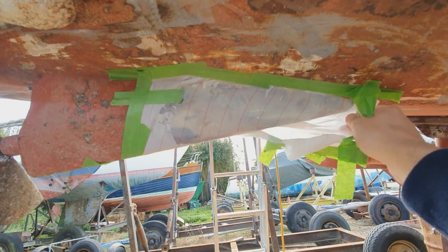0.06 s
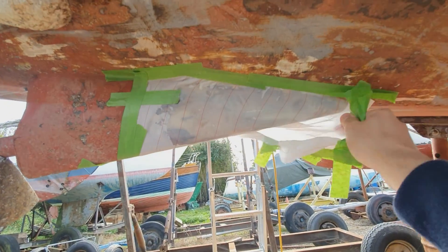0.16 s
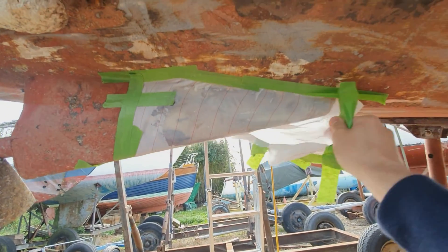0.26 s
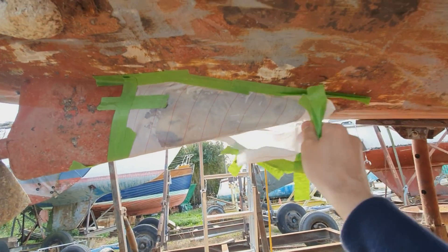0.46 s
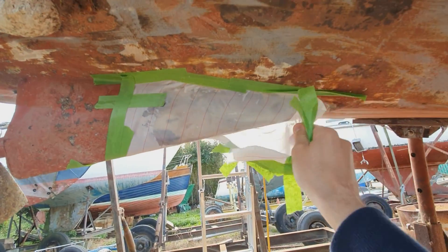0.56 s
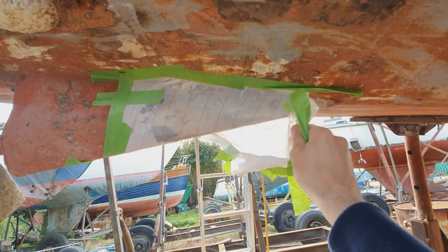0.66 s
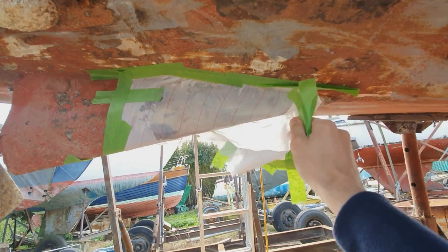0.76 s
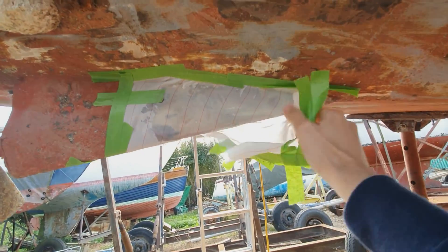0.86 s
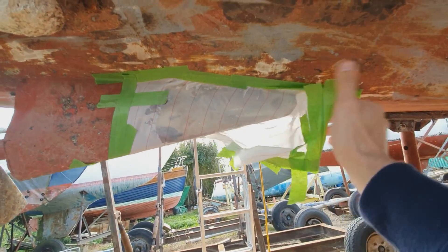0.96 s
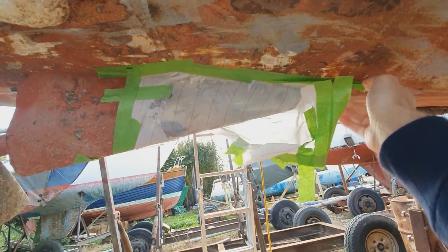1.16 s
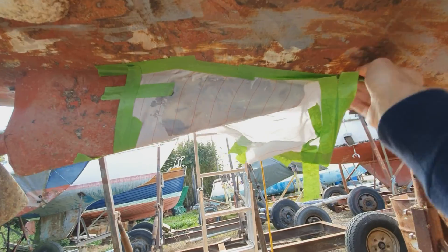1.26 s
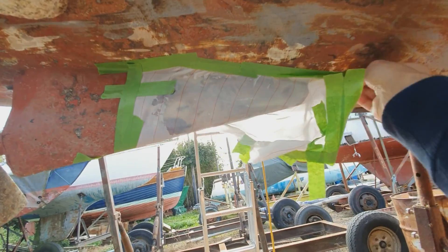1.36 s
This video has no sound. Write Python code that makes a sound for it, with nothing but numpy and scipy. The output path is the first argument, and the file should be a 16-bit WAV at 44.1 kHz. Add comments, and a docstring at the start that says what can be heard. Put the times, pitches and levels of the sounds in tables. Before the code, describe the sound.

Tape rips off a boat hull with a brief crackle, then loose plastic crinkles faintly.

```python
"""Peeling tape off a boat hull

In a boatyard, close to the microphone and to its right, a hand peels masking tape and plastic sheeting
off a hardened patch. The glue lets go in a rush of tiny slips and a few hard snaps; the freed sheet
drums lower as it grows, then falls slack. Last crinkles and a soft hiss follow, over the yard's hum."""
import sys
import numpy as np
from scipy import signal
from scipy.fft import rfft, irfft
from scipy.io import wavfile
from scipy.ndimage import uniform_filter1d

SR = 44100
rng = np.random.default_rng(int(sys.argv[2]) if len(sys.argv) > 2 else 0)


def generate_wav(signal):
    """Clip the signal to [-1, 1] and save it as 16-bit WAV at the path in sys.argv[1]."""
    frames = np.transpose(np.atleast_2d(signal))
    scaled = np.clip(frames, -1, 1) * 32767
    pcm = np.round(scaled).astype(np.int16)
    wavfile.write(sys.argv[1], SR, pcm)


N = 61739
TIME = np.arange(N) / SR


def amp(db):
    """Decibels to gain."""
    return 10 ** (np.asarray(db) / 20)


def unit_rms(x):
    """Scales to unit rms."""
    return x / np.sqrt(np.mean(x ** 2) + 1e-20)


def curve(rows, column=1):
    """One column of a time table, at every sample."""
    rows = np.array(rows)
    return np.interp(TIME, rows[:, 0], rows[:, column])


def at_hz(spectrum, hz):
    """Reads a spectrum table on a log-frequency axis."""
    f, value = np.transpose(spectrum)
    return np.interp(np.log(hz + 1), np.log(f + 1), value)


def drift(seconds):
    """A smooth random wander of unit size that changes in about this time."""
    hz = np.fft.rfftfreq(N, 1 / SR)
    return unit_rms(irfft(rfft(rng.standard_normal(N)) / (1 + (2 * hz * seconds) ** 4), N))


def colour(spectrum, size=2048):
    """A causal filter with this spectrum."""
    log_gain = np.log(amp(at_hz(spectrum, abs(np.fft.fftfreq(size, 1 / SR)))))
    return np.fft.ifft(np.exp(np.conj(signal.hilbert(log_gain)))).real[:size // 2]


def through(x, response):
    """Convolves and cuts to length."""
    return signal.fftconvolve(x, response)[:N]


def resonate(x, hz, width_hz, rise_s):
    """Drives a decaying mode of unit energy."""
    t = TIME[:SR // 8]
    ring = np.exp(-np.pi * width_hz * t) * np.cos(2 * np.pi * hz * t) * (1 - np.exp(-t / rise_s))
    return through(x, ring / np.linalg.norm(ring))


def slips(per_s, spread_db=1, clump_db=1, clump_s=0.0026):
    """Tiny clumped slips of uneven size, at a steady average strength."""
    size = amp(spread_db * np.minimum(rng.exponential(1, N), 3) - clump_db * drift(clump_s))
    clicks = size * rng.choice([-1., 1.], N) * (rng.random(N) < per_s / SR)
    return clicks / np.sqrt(abs(uniform_filter1d(clicks ** 2, size=900)) + 1e-9)


def avalanches(rows, decay_s=0.001, edge=0.8, size=256):
    """Each row is a brief avalanche of slips, with one tug on the sheet."""
    cracks, tugs = np.zeros((2, N + size))
    for start_s, crack_db, thump_db in rows:
        burst = rng.standard_normal(size) ** 3 * np.exp(-TIME[:size] / decay_s)
        burst[0] = edge * np.linalg.norm(burst)  # the first crack stands out
        at = round(start_s * SR)
        cracks[at:at + size] += 0.3 * amp(crack_db) * unit_rms(burst)
        tugs[at] += 9 * amp(thump_db)
    return cracks[:N], tugs[:N]


def crackle(clicks, spectrum, creases=10, scatter=1.5, scatter_s=0.0014):
    """Each click leaves one of several creases and scatters off hand and hull to each microphone."""
    crease = rng.integers(0, creases, N)
    t, tone = TIME[:SR // 100], colour(spectrum)
    mics = np.zeros((2, N))
    for k in range(creases):
        for mic in mics:
            path = rng.standard_normal(len(t)) * np.exp(-t / scatter_s)
            path *= scatter / np.linalg.norm(path)
            path[0] = 1  # the direct sound
            mic += through(clicks * (crease == k), path / np.linalg.norm(path))
    return np.array([through(mic, tone / np.linalg.norm(tone)) for mic in mics])


# The open yard, all around the microphones: frequency_hz, relative_db
YARD_SPECTRUM = [(20, -25), (38, -17.5), (54, 8), (75, -1), (110, -12.5), (160, -6), (220, -20.5),
                 (400, -23), (900, -33.5), (1350, -35.5), (2200, -41.5), (3500, -54.5), (8000, -59.5),
                 (15000, -64.5)]

def yard(level_db=-38.5, patch_db=2, swell_db=2.5, rumble_hz=110, apart_hz=800):
    """Swelling rumble and distant wash, alike at both microphones in the bass."""
    frames, hz = N // 512 + 5, np.fft.rfftfreq(2048, 1 / SR)[:, None]
    a, b, c, d, patches = rng.standard_normal((frames, len(hz), 5)).T
    patches = unit_rms(uniform_filter1d(uniform_filter1d(patches, size=10, axis=0), size=8, axis=1))
    swell = np.resize(drift(seconds=0.045)[::512], frames) / (1 + (hz / rumble_hz) ** 4)
    gain = amp(at_hz(YARD_SPECTRUM, hz) + patch_db * patches + swell_db * swell)
    alike = 0.9 / (1 + (hz / apart_hz) ** 2)
    left = a + 1j * b
    right = alike * left + np.sqrt(1 - alike ** 2) * (c + 1j * d)
    wash = signal.istft(np.array([left, right]) * gain, nperseg=2048, noverlap=1536)[1]
    return amp(level_db) * unit_rms(wash[:, :N])


# Tones of a machine, far from the microphones: pitch_hz, level_db
HUM_TONES = [(97.5, -44.5), (140.5, -48), (280, -61.5), (334, -67)]

def machine_hum(waver_hz=2.596, waver_db=1, waver_s=0.12):
    """A distant machine hums in low tones that waver in pitch and strength."""
    hum = np.zeros(N)
    for hz, db in HUM_TONES:
        strength = amp(waver_db * drift(waver_s))
        phase = 2 * np.pi * np.cumsum(hz + waver_hz * drift(waver_s)) / SR
        hum += amp(db) * unit_rms(strength * np.sin(phase))
    return hum


def machine_whir(level_db=-67):
    """A machine far across the yard whirs in a faint narrow band of noise."""
    bands = [resonate(x, hz=1310, width_hz=440, rise_s=0.0052) for x in rng.standard_normal((2, N))]
    return amp(level_db) * np.array([unit_rms(band) for band in bands])


# The slow first pull, close to the microphones: time_s, level_db
CREEP_LEVEL = [(0, -48), (.04, -43.5), (.085, -54.5), (.135, -50), (.165, -38), (.22, -30.5), (.29, -28),
               (.325, -31.5), (.36, -31.5), (.381, -37.5), (.42, -60), (.45, -100)]
# Its rasp: frequency_hz, relative_db
CREEP_SPECTRUM = [(100, -11.5), (250, -6), (500, 1.5), (1000, 2.5), (1500, -2), (2200, 4.5), (3100, -1),
                  (4200, -0.5), (6300, -5), (7800, -8), (9200, -10.5), (12000, -8), (15000, -8.5)]

def tape_creep():
    """The tape creeps off the hull in a dense stream of tiny slips."""
    return crackle(slips(per_s=6000) * amp(curve(CREEP_LEVEL)), CREEP_SPECTRUM)


# The freed sheet, close by, as the slips shake it: time_s, level_db, centre_hz
SHEET_DRIVE = [(0, -79, 770), (.13, -55, 890), (.18, -50, 900), (.37, -40.5, 1190), (.42, -27.5, 1055),
               (.487, -20.5, 1040), (.505, -21, 704), (.555, -20, 600), (.574, -31.5, 390),
               (.588, -70, 280), (.68, -90, 614), (.8, -100, 350)]
# Its modes: pitch_hz, width_hz, relative_db
SHEET_RESONANCES = [(171.6, 97, 4), (280, 35, -10.5), (385.7, 50, -1.5), (519.6, 47, -4.5), (623.6, 71, -5),
                    (710, 68, 1.5), (977.4, 24, -8), (1073, 84, 0), (1236, 18, -3), (1844, 70, -0.5)]

def sheet_drum(grains, tugs, spread_octaves=0.65):
    """The sheet rings like a drum skin, the modes near a moving centre pitch driven hardest."""
    drive = grains * amp(curve(SHEET_DRIVE)) + tugs
    centre_hz = curve(SHEET_DRIVE, column=2)
    gains = [amp(db) * np.exp(-0.5 * (np.log2(hz / centre_hz) / spread_octaves) ** 2)
             for hz, _, db in SHEET_RESONANCES]
    total = np.linalg.norm(gains, axis=0)
    return sum(resonate(drive * gain / total, hz, width_hz, rise_s=0.0009)
               for gain, (hz, width_hz, _) in zip(gains, SHEET_RESONANCES))


# Single snaps of the glue, close up, at relative levels: start_s, crack_db, thump_db
GLUE_SNAPS = [(0.0121, -32, -64), (.038, -36, -36), (0.0585, -50, -45.5), (0.108, -34.5, -36),
              (.124, -42, -50), (0.1418, -28.5, -36.5), (0.1593, -28, -31.5), (0.1757, -30, -37.5),
              (0.1854, -24, -28), (.197, -24.5, -39), (0.213, -23.5, -41), (0.2932, -24, -34),
              (.3526, -25, -23.5), (0.3888, -12, -20.5), (.398, -20, -24), (.412, -17.5, -36),
              (.4218, -15, -13), (.447, -20, -19), (.503, -11, -10), (.512, -16, -41), (.5158, -25, -39),
              (.521, -21, -12.5), (.532, -16, -39), (.547, -19, -23), (.565, -16, -18.5), (0.571, -21, -36)]
# The rush as the tape comes free: time_s, level_db
RIP_LEVEL = [(.37, -100), (.384, -45), (.395, -29.5), (.43, -25.5), (.47, -25.5), (.51, -19), (.55, -22.5),
             (.572, -22.5), (.59, -41.5), (.63, -80), (.68, -100)]
# The colour of both: frequency_hz, relative_db
GLUE_SPECTRUM = [(100, -28), (250, -10), (500, -5.5), (1000, -2), (1450, -7), (1900, -1), (2400, -5.5),
                 (2900, 0.5), (4200, -3), (6400, -3.5), (8000, -15.5), (9200, -7.5), (12000, -13.5),
                 (15500, -14)]

def glue_rip(grains):
    """The glue snaps, then rips free in a rush of slips; gives the sound and the tugs on the sheet."""
    cracks, tugs = avalanches(GLUE_SNAPS)
    return crackle(grains * amp(curve(RIP_LEVEL)) + cracks, GLUE_SPECTRUM), tugs


def sheet_flap(start_s=0.56, length_s=0.018, from_hz=397.2, to_hz=110, level_db=-27.5):
    """The sheet swings once, sinking in pitch as its tension goes."""
    progress = np.clip((TIME - start_s) / length_s, 0, 1)
    hz = from_hz * (to_hz / from_hz) ** progress
    cycles = np.cumsum(hz) / SR + rng.random()
    return amp(level_db) * np.sin(np.pi * progress) * np.sin(2 * np.pi * cycles)


# Loose plastic near the microphones, as the fingers take hold again: time_s, level_db
RUSTLE_LEVEL = [(.59, -85), (.668, -54.5), (.69, -43.5), (.73, -52.5), (.755, -62.5), (.80, -64),
                (.845, -66.5), (.90, -52.5), (.95, -73), (1.0, -86), (1.37, -79), (1.388, -51), (1.4, -57)]
# Its single crinkles, at relative levels: start_s, crack_db, thump_db
PLASTIC_CRINKLES = [(.606, -49, -50), (.618, -36, -48), (.657, -43, -50), (.6715, -32, -49),
                    (.678, -32.5, -37), (.6953, -24, -32), (.6985, -25.5, -31.5), (.7205, -35, -45),
                    (.735, -36, -40), (.773, -45, -51), (.7975, -58, -36.5), (.846, -66, -47),
                    (1.089, -58.5, -62)]
# The thin colour of both: frequency_hz, relative_db
PLASTIC_SPECTRUM = [(100, -16), (500, -2), (1000, 1), (1900, -4), (2400, -2.5), (3300, 1.5), (6400, 1),
                    (8000, -9.5), (9200, -4), (12000, -8), (15500, -8)]

def slack_plastic(grains):
    """The slack plastic rustles and crinkles; gives the sound and the tugs on the sheet."""
    crinkles, tugs = avalanches(PLASTIC_CRINKLES)
    rustle = grains * amp(curve(RUSTLE_LEVEL)) * (TIME > RUSTLE_LEVEL[0][0])
    return crackle(rustle + crinkles, PLASTIC_SPECTRUM), tugs


# A faint hiss, stronger at the right microphone: time_s, level_db
HISS_LEVEL = [(1.228, -100), (1.242, -69.5), (1.27, -60.5), (1.32, -68), (1.4, -69)]

def hiss(centre_hz=6560, width_hz=1500, left_db=-5):
    """A narrow band of high noise comes up quickly and eases off, like a soft brush."""
    hz = np.fft.rfftfreq(N, 1 / SR)
    band = 1 / (1 + (2 * (hz - centre_hz) / width_hz) ** 4)
    noise = unit_rms(irfft(rfft(rng.standard_normal((2, N))) * band, N))
    return noise * amp(curve(HISS_LEVEL)) * amp([[left_db], [0]])


# The space beside the hull, and its time to die away by 60 dB: frequency_hz, decay_s
HULL_DECAY = [(150, .18), (700, .22), (3000, 0.15), (8000, 0.12), (15000, 0.25)]

def reflections(x, build_s=0.018):
    """Hull and ground return a short diffuse tail, different at each microphone."""
    hz, t, noise = signal.stft(rng.standard_normal((2, SR // 2)), SR, nperseg=256)
    envelope = amp(-60 * t / at_hz(HULL_DECAY, hz)[:, None]) * np.minimum(t / build_s, 1)
    tails = signal.istft(noise * envelope, SR, nperseg=256)[1]
    return np.array([through(x, tail / np.linalg.norm(tail)) for tail in tails])


# Shading at the left microphone, on the side away from the tape: frequency_hz, gain_db
LEFT_SHADOW = [(100, -2.5), (1000, -0.5), (1300, 3), (1900, -2.5), (3000, -7.5), (5000, -7), (7000, -8),
               (8800, -0.5), (10800, -8), (12500, -3.5), (15000, -8.5)]

def from_the_right(left, right, lag_s=0.00026):
    """Sound from the right reaches the left microphone later and shaded."""
    late = np.r_[np.zeros(round(lag_s * SR)), left]
    return np.array([through(late, colour(LEFT_SHADOW)), right])


def scene():
    """The peeling close by on the right, the yard and its machinery behind."""
    grains = slips(per_s=2600)  # the same slips crackle directly and shake the sheet
    rip, glue_tugs = glue_rip(grains)
    rustle, plastic_tugs = slack_plastic(grains)
    tape = tape_creep() + rip + rustle
    sheet = sheet_drum(grains, glue_tugs + plastic_tugs)
    left, right = tape + sheet + amp(-10.5) * reflections(tape[1]) + amp(-32) * reflections(sheet)
    background = yard() + machine_hum() + machine_whir()
    return background + from_the_right(left, right) + sheet_flap() + hiss()


def record(dry, low_cut_hz=42, band_limit_hz=15550):
    """The recorder's low cut and band limit."""
    low_cut = signal.butter(N=4, Wn=low_cut_hz, btype="high", fs=SR, output="sos")
    band_limit = signal.firwin(511, band_limit_hz, window=("kaiser", 9), fs=SR)
    return signal.oaconvolve(signal.sosfilt(low_cut, dry), band_limit[None], "same")


dry = scene()
out = record(dry)
generate_wav(out)
```